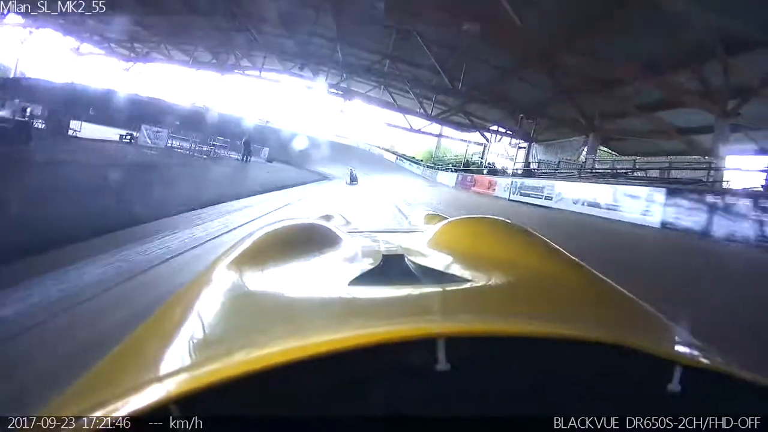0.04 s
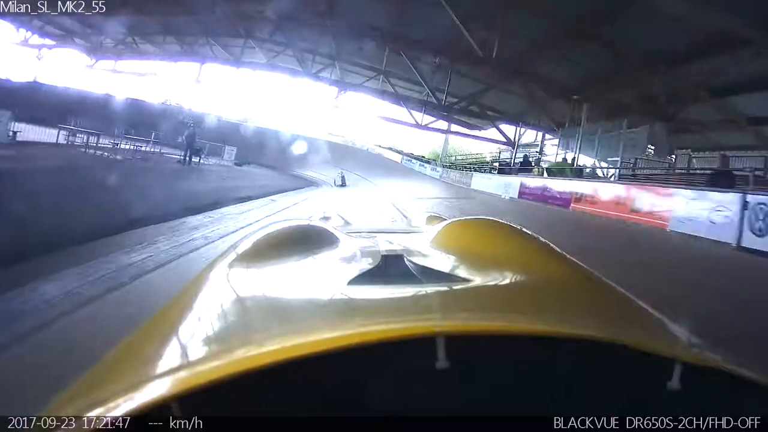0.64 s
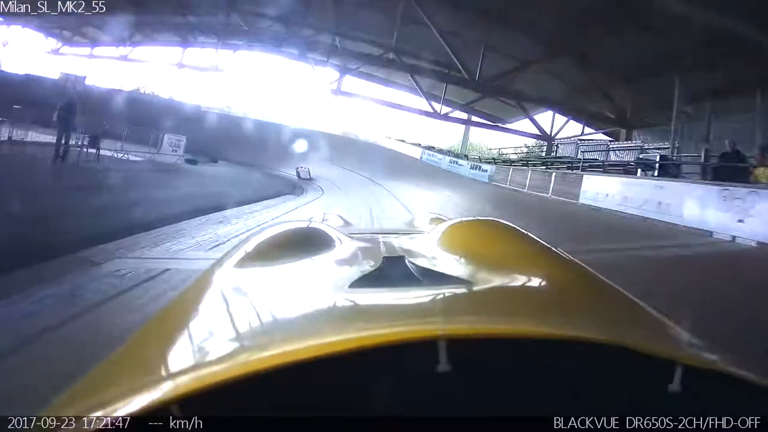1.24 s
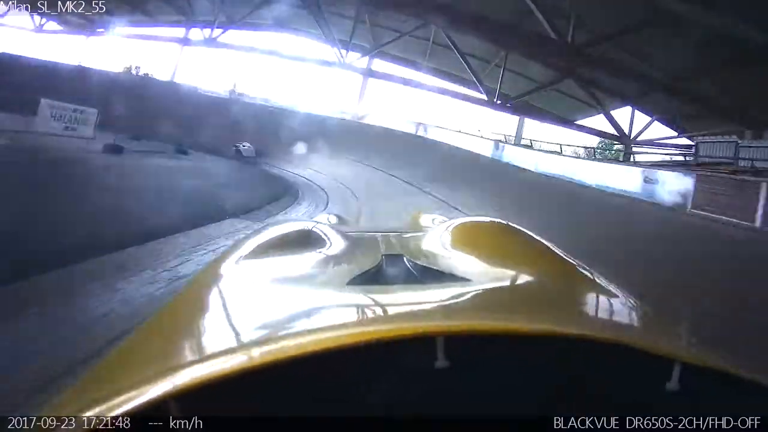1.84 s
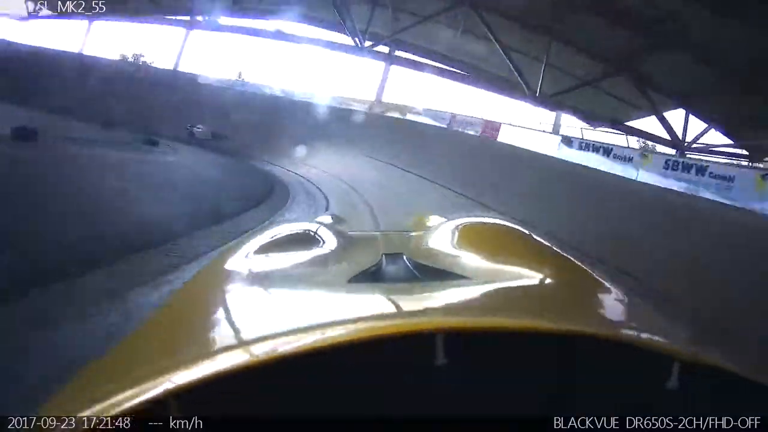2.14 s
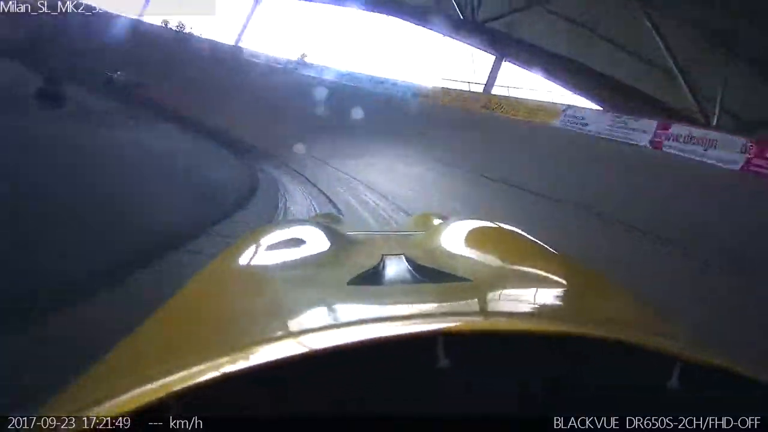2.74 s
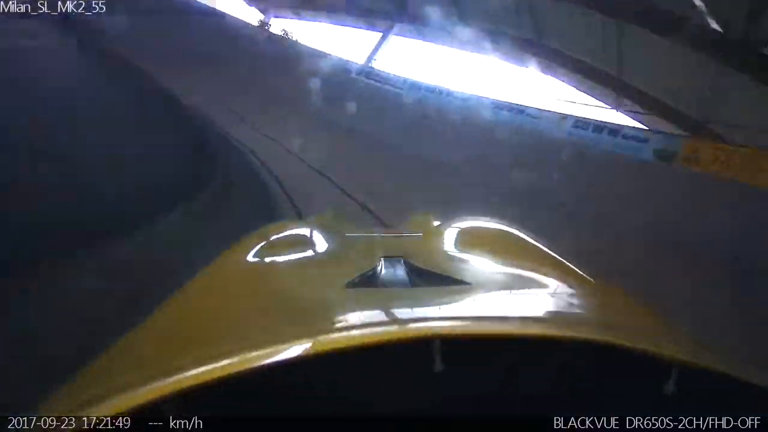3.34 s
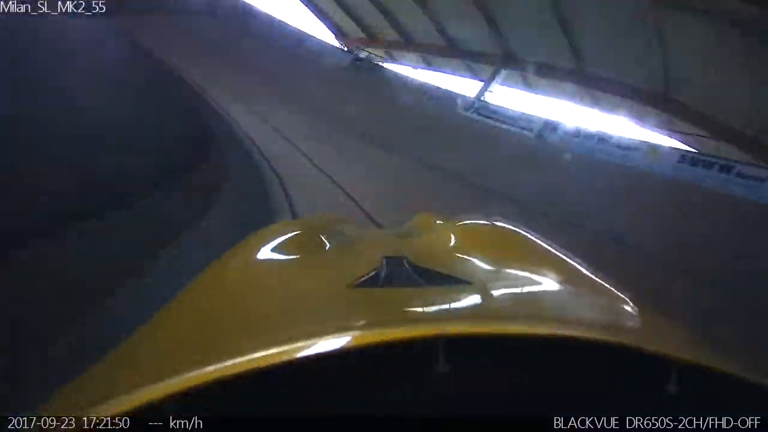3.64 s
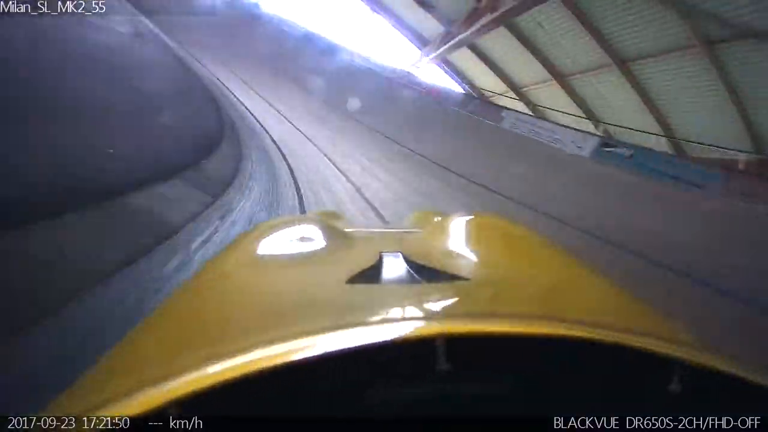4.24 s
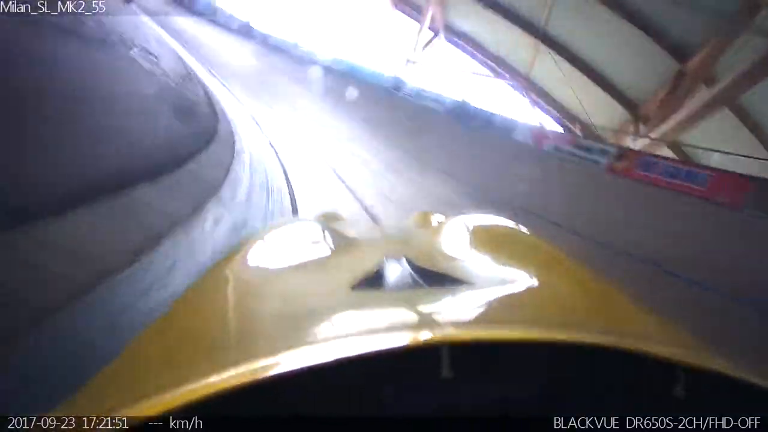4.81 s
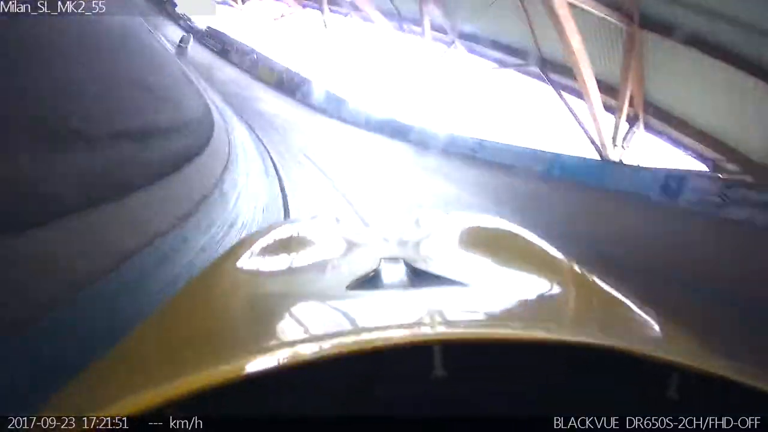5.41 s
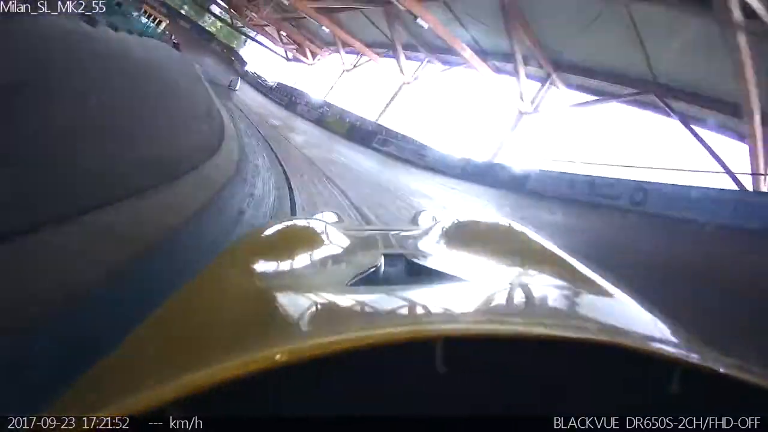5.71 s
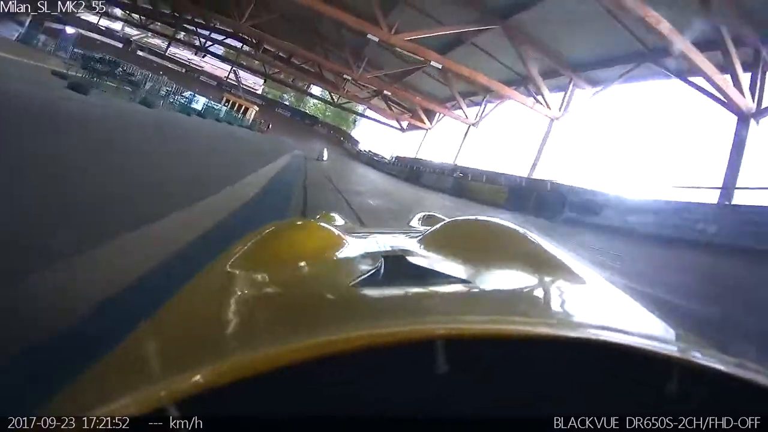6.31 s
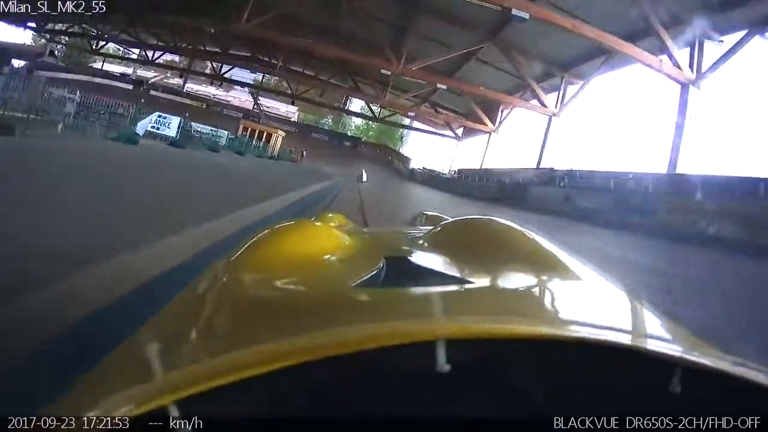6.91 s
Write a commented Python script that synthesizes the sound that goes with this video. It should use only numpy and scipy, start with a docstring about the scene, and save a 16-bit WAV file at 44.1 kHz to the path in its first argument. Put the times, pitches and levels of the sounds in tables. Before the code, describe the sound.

A deep, throbbing rumble with hollow thumps and rattles inside an enclosed pedal vehicle rolling fast around a covered track.

```python
"""A deep, throbbing rumble with hollow thumps: on board a velomobile, fast through a covered track's bend.
The track and the unround wheels shake the resonant shell, and the rumble swells as the banked turn
loads the tyres. Joints thump, loose fittings rattle, the drivetrain ticks, a tyre brushes its wheel well.
The chain hums with each push and rubs once per crank turn. The small microphone is driven to its limit."""
import sys
import numpy as np
from scipy import signal
from scipy.fft import rfft, irfft
from scipy.io import wavfile
from scipy.ndimage import uniform_filter1d, map_coordinates

SR = 44100
rng = np.random.default_rng(int(sys.argv[2]) if len(sys.argv) > 2 else 0)


def dump(signal):
    """Clip the signal to [-1, 1] and save it as 16-bit WAV at the path in sys.argv[1]."""
    limited = np.clip(np.atleast_2d(signal).T, -1, 1)
    pcm = np.round(limited * 32767).astype(np.int16)
    wavfile.write(sys.argv[1], SR, pcm)


N = 311346
SIZE = 2 ** 14  # samples in one hit or impulse response
TIME, AGE = np.arange(N) / SR, np.arange(SIZE) / SR
FREQ = np.maximum(np.arange(SIZE // 2 + 1) * SR / SIZE, 1)
TOP_HZ = 7330
CRANK_TURN_S, FIRST_PUSH_S = 0.788, 0.14

# speed of the wheels: time_s, turns_per_s
WHEEL_SPEED = [(0, 9.38), (1.2, 9.42), (2.1, 9.56), (3.3, 9.9), (4.6, 9.84), (6, 9.7), (7.06, 9.52)]
# tone of a contact on the shell: frequency_hz, gain_db
CONTACT_EQ = [(300, -26), (800, 6), (1050, 3), (1400, -1), (2000, -1.5), (2900, -4), (3900, -8),
              (5200, -8.5), (6300, -14.5), (7400, -20)]


def undb(db):
    """Decibels to gain."""
    return 10 ** (np.asarray(db) / 20)


def unit(x):
    """Scale to rms 1."""
    return x / np.sqrt(np.mean(np.abs(x) ** 2))


def add(out, start_s, sound):
    """Mix a sound in at a time."""
    part = out[max(int(start_s * SR), 0):][:len(sound)]
    part += sound[:len(part)]


def walk(rate_hz):
    """Random levels joined by straight lines; spread near 1."""
    levels = rng.standard_normal(2000)
    return 1.2 * np.interp(TIME * rate_hz, np.arange(len(levels)), levels)


def blow(rise_s, t60_s):
    """Envelope of a hit that builds up and dies away."""
    return (1 - np.exp(-AGE / rise_s)) * np.exp(-np.log(1000) * AGE / t60_s)


def swell(peak_s, rise_s, fall_s):
    """Bell-shaped envelope with its own attack and release."""
    width_s = np.where(TIME < peak_s, rise_s, fall_s)
    return np.exp(-np.minimum(((TIME - peak_s) / width_s) ** 2 / 2, 50))


def colour(points, tilt_db=0):
    """EQ curve through (Hz, dB) points, tilted by tilt_db an octave, with the top rolled off."""
    hz, db = np.transpose(points)
    gain = undb(np.interp(np.log(FREQ), np.log(hz), db + tilt_db * np.log2(hz)))
    gain = gain / np.sqrt(1 + (FREQ / TOP_HZ / 1.15) ** 16)
    cepstrum = irfft(np.log(gain))  # folded to minimum phase: nothing rings ahead of a hit
    cepstrum[1:SIZE // 2] *= 2
    cepstrum[SIZE // 2 + 1:] = 0
    return np.exp(rfft(cepstrum))


def resonance(hz, width_hz):
    """Response of one damped mode, gain 1 at its centre."""
    return 1 / (1 + 1j * (FREQ / hz - hz / FREQ) * hz / width_hz)


def panels(modes):
    """Response of a wall with modes given as (pitch_hz, width_hz, lift_db)."""
    return np.prod([1 + (undb(db) - 1) * resonance(hz, width) for hz, width, db in modes], axis=0)


def through(force, response):
    """Filter a force, keeping the level of a white one."""
    return signal.fftconvolve(force, irfft(unit(response)))[:len(force)]


def noise(response):
    """Steady noise coloured by a response; rms near 1."""
    return through(rng.standard_normal(N), response)


def grit(spread_db, size=N, grain=32):
    """Dense tiny contacts of unequal strength, each grain samples long; rms 1."""
    strength = np.repeat(undb(spread_db * rng.standard_normal(size // grain + 1)), grain)
    return unit(strength[:size] * rng.standard_normal(size))


def steadied(x, span_s, amount):
    """Hold back the largest swings of a vibration, as a damper does; rms 1."""
    power = uniform_filter1d(x ** 2, int(span_s * SR))
    return unit(x / (power + 1e-3) ** (amount / 2))


def strike(envelope, response, spread_db):
    """A flurry of contacts rings a body, with the energy of its envelope."""
    ring = through(envelope * grit(spread_db, size=SIZE), response)
    return unit(ring) * np.sqrt(np.mean(envelope ** 2))


def pedalling(dead_centre_share=0.13):
    """Drive of the legs: 1 in mid-push, twice a crank turn, and least at the dead centres."""
    leverage = np.abs(np.cos(2 * np.pi * (TIME - FIRST_PUSH_S) / CRANK_TURN_S))
    return dead_centre_share + (1 - dead_centre_share) * leverage


def sway(load, turns):
    """Sub-bass bed: the shell rocks on its suspension and throbs once per wheel turn."""
    # tone of the sway: frequency_hz, gain_db
    sway_eq = [(5, -16), (17, -4.5), (27, -1), (40, -1.5), (56, -3), (68, -4), (88, -10), (108, -12),
               (128, -16), (200, -34), (500, -72.5)]
    rocking = steadied(noise(colour(sway_eq)), span_s=0.16, amount=0.6)
    throb_db = 1.85 * np.sin(2 * np.pi * turns)
    return undb(-14 + 2.5 * load + throb_db) * rocking


def wheel_drone(turns, waver_db=3):
    """Unround wheels drone on the multiples of their turning rate, each wavering in strength."""
    # shakes at once, twice, three times ... a wheel turn: level_db
    harmonics = [-27.5, -20, -18.5, -27, -23.5, -27.5, -20, -26, -32.5]
    out = 0
    for order, db in enumerate(harmonics, start=1):
        waver = undb(waver_db * walk(4))
        out += undb(db) * unit(waver * np.sin(2 * np.pi * (order * turns + rng.random())))
    return out


def heaves(half_s=0.036):
    """Each long wave in the track bounces the shell on its suspension a few times."""
    # waves in the track: peak_s, level_db, pitch_hz
    waves = [(1.611, -6.5, 30), (2.56, -7.5, 28), (3.15, -8, 29.24), (3.68, -8, 34.8), (4.25, -10, 25.2),
             (4.9, -8, 29.98)]
    out = 0
    for peak_s, db, hz in waves:
        bounce = unit(np.sin(2 * np.pi * (hz * TIME + rng.random())))
        out += undb(db) * swell(peak_s, half_s, half_s) * bounce
    return out


def shudder():
    """A low judder of the shell comes on entering the bend and slowly settles."""
    judder = steadied(noise(resonance(hz=93.5, width_hz=76) ** 2), span_s=0.12, amount=0.39)
    return undb(-15.5) * swell(peak_s=3.17, rise_s=0.095, fall_s=0.3) * judder


def tread_hiss(shell, load, roughness_db):
    """Tiny contacts of the tread make a fine hiss, louder in the bend and on rough patches."""
    # tone of the tread: frequency_hz, gain_db
    hiss_eq = [(500, -13), (1200, 9.5), (1900, 0.5), (2700, -2), (3300, -6), (4000, -13), (5400, -9),
               (6300, -14.5), (7400, -18)]
    return undb(-43.5 + 2.5 * load + roughness_db) * through(grit(3.6), colour(hiss_eq) * shell)


def well_drum(load, hz=536, sag_hz=28):
    """The track keeps the wheel wells ringing on one hollow note, which sags under load."""
    ring = noise(resonance(hz, width_hz=38) ** 2)
    slowed_position = np.cumsum(1 - load * sag_hz / hz)
    return unit(map_coordinates(ring, [slowed_position], mode="mirror"))


def rumble(shell, load, drive, roughness_db):
    """The track drums through the tyres into the cabin, swelling with the bend and with each push."""
    # tone of the rolling noise: frequency_hz, gain_db
    rumble_eq = [(70, -21.5), (125, -0.5), (185, 0), (310, -2.5), (460, -5), (660, -11.5), (850, -15),
                 (1000, -16), (1170, -25.5), (1500, -26), (1900, -34.5), (3000, -39.5), (7000, -63)]
    roar = steadied(noise(colour(rumble_eq) * shell), span_s=0.049, amount=0.81)
    drum = undb(-16.5 + 3 * load) * well_drum(load)
    level_db = -20.5 + 3 * load + 2 * (drive - 1) + 0.6 * roughness_db
    return undb(level_db) * (roar + drum)


def chain_hum(drive, teeth=16, wander=0.0143):
    """Links roll onto the sprocket with a hum that follows the wheels; the cabin air booms along."""
    # hum at full drive, one value per push of a leg: level_db
    pushes = [-27.5, -22, -22.5, -20, -22, -17.5, -26.5, -18, -24, -20, -21, -18.5, -19.5, -19.5, -18.5,
              -28.5, -25, -25]
    push_s = FIRST_PUSH_S + np.arange(len(pushes)) * CRANK_TURN_S / 2
    mesh_hz = teeth * np.interp(TIME, *np.transpose(WHEEL_SPEED)) * (1 + wander * walk(12))
    mesh = unit(np.sin(2 * np.pi * np.cumsum(mesh_hz) / SR))
    boom = steadied(noise(resonance(hz=153.6, width_hz=10) ** 2), span_s=0.032, amount=1)
    return undb(np.interp(TIME, push_s, pushes)) * drive * (mesh + undb(-10.5) * boom)


def chain_rub(shell, sing_width_hz=590, whistle_width_hz=75, linger=1.5):
    """Links rasp along their guide once per crank turn, and the metal sings, never quite alike."""
    # rubs of the chain: peak_s, ring_db, rasp_db, rise_s, pitch_hz, whistle_lift_db
    rubs = [(0.3, -49.5, -33.5, 0.037, 5630, 3), (1.102, -51, -38.5, 0.033, 5560, 7),
            (1.925, -57, -40.5, 0.04, 5540, 3), (2.665, -57, -46, .04, 5570, 6),
            (3.463, -53.5, -43, 0.034, 5630, 6), (4.225, -50, -44, 0.036, 5520, 4),
            (5.014, -55.5, -40, 0.055, 5580, 2.5), (5.805, -49, -37, 0.031, 5610, 3),
            (6.62, -55, -36.5, 0.043, 5530, 3)]
    # tone of the rasp: frequency_hz, gain_db
    rasp_eq = [(700, -25), (1400, 8), (1850, -2.5), (2250, -4), (2900, -2), (3250, -17.5), (3600, -12),
               (4000, -14), (5600, -22), (7400, -23.5)]
    out, rasp = 0, noise(colour(rasp_eq) * shell)
    for peak_s, ring_db, rasp_db, rise_s, hz, whistle_db in rubs:
        whistle = panels([(hz, whistle_width_hz, whistle_db)])
        ring = noise(resonance(hz, sing_width_hz) ** 2 * whistle)
        out += swell(peak_s, rise_s, rise_s * linger) * (undb(ring_db) * ring + undb(rasp_db) * rasp)
    return out


def drivetrain_ticks(shell, faint_count=6, faint_db=-45.5):
    """Hard clicks of the drivetrain ring briefly in the cabin; faint ones fall at random."""
    # sharp ticks: start_s, level_db
    ticks = [(0.916, -42), (1.062, -39), (2.387, -40.5), (2.702, -43), (2.972, -34.5), (3.352, -47),
             (3.702, -29), (3.98, -32.5), (4.052, -44), (4.802, -41), (4.923, -35), (5.42, -33.5),
             (5.624, -42), (5.87, -36.5), (6.65, -36), (6.829, -36)]
    # tone of a tick: frequency_hz, gain_db
    tick_eq = [(600, -11.5), (1500, -5), (3000, 4.5), (4200, -4), (5000, 0.5), (6000, -15.5), (7400, -6.5)]
    out, body = np.zeros(N), colour(tick_eq) * shell
    decay = blow(0.00036, 0.0082) + 0.18 * blow(0.002, 0.11)
    crack = 10 * irfft(unit(body))  # the first contact is one clean impulse
    faint = [(when * N / SR, faint_db - 10 * softness) for when, softness in rng.random((faint_count, 2))]
    for start_s, db in ticks + faint:
        add(out, start_s, undb(db) * (crack + strike(decay, body, spread_db=0.5)))
    return out


def tyre_scrape(shell):
    """Deep in the turn, rubber sticks and slips on the wheel well, whose wall squeaks."""
    # brushes of the tyre: peak_s, level_db, rise_s, fall_s
    scrapes = [(4.279, -23, 0.059, 0.015), (5.02, -29.5, 0.019, 0.024)]
    # squeaks of the wheel well: pitch_hz, width_hz, lift_db
    squeaks = [(969, 13, 13.5), (1046, 24, 12.5), (2960, 75, 5.5), (3630, 90, 5), (5500, 200, 3)]
    force = sum(undb(db) * swell(peak_s, rise_s, fall_s) for peak_s, db, rise_s, fall_s in scrapes)
    return through(force * grit(1.3), colour(CONTACT_EQ, tilt_db=-3) * shell * panels(squeaks))


def rattles(shell, ring_width_hz=150, ring_lift_db=7.5):
    """A loose fitting cracks against the shell, then rings and chatters in a dying flurry."""
    # knocks of the fittings: start_s, level_db, t60_s, tilt_db_per_octave, pitch_hz
    knocks = [(0.539, -45, 0.15, 5, 6550), (0.814, -27, 0.22, -10, 1420), (2.019, -31.5, 0.074, -2.5, 5500),
              (2.129, -28, 0.053, -6, 2260), (2.715, -27.5, 0.21, -5, 2820), (3.152, -35.5, 0.56, -2, 5500),
              (3.194, -20, 0.1, -2.5, 5470), (3.378, -17, 0.03, -10, 2260),
              (3.669, -31.5, 0.15, -3.5, 4370), (3.941, -25, 0.097, -5.5, 2863),
              (4.524, -18.5, 0.076, -12.5, 2270), (4.626, -28.5, 0.23, -3.5, 2260),
              (5.252, -20.5, 0.099, -7, 2230), (5.563, -22.5, 0.13, -4, 2750), (5.64, -30, 0.06, -3, 4330),
              (5.719, -27.5, 0.1, -1.5, 2440), (5.785, -22, 0.07, -3, 5500), (6.108, -17, 0.071, -9, 2300),
              (6.216, -21.5, 0.051, -9.5, 2320), (6.262, -37, 0.11, -1.5, 3800),
              (6.317, -33.5, 0.16, -2.5, 5550)]
    out = np.zeros(N)
    crack = undb(3) * blow(rise_s=0.0017, t60_s=0.018)
    for start_s, db, t60_s, tilt_db, hz in knocks:
        body = colour(CONTACT_EQ, tilt_db) * shell * panels([(hz, ring_width_hz, ring_lift_db)])
        add(out, start_s, undb(db) * strike(crack + blow(0.0023, t60_s), body, spread_db=0.5))
    return out


def clonk(tilt_db, scatter_db=1.5, detune=0.014):
    """The panels ring freely after a jolt; each clonk is duller or brighter by its own tilt."""
    # notes of the panels: pitch_hz, level_db, t60_s
    modes = [(279.6, -7.5, 0.13), (344, -6, 0.096), (587, -15, 0.24), (714.5, -22.5, 0.22),
             (843, -13.5, 0.11)]
    out = 0
    for hz, db, t60_s in modes:
        louder, sharper, phase = rng.standard_normal(3)
        note = unit(np.sin(2 * np.pi * (hz * (1 + detune * sharper) * AGE + phase)))
        level_db = db + tilt_db * np.log2(hz / 380) + scatter_db * louder
        out += undb(level_db) * blow(0.004, t60_s) * note
    return out


def joint_thumps(shell):
    """Each track joint jolts the shell: a dull thud under the clonk of its panels."""
    # wheels crossing joints: start_s, level_db, tilt_db_per_octave (low is dull, high is bright)
    joints = [(.086, -9, 1), (0.234, -9, -5.5), (.514, -8.5, 0), (0.659, -8.5, 0), (.806, -23, 4),
              (0.943, -8.5, -0.5), (1.239, -22, 5), (1.371, -8.5, -1.5), (1.797, -15.5, 1.5),
              (2.077, -12, 0.5), (2.465, -11.5, -3), (2.794, -13.5, 2.5), (2.93, -15.5, 1),
              (3.188, -12.5, -0.5), (3.351, -10, -3), (3.457, -14, 1), (3.531, -11.5, -4.5),
              (3.657, -11.5, -2.5), (3.891, -13.5, 2.5), (4.017, -12, -2), (4.504, -17, 0.5),
              (4.739, -8, -4), (4.996, -14.5, 2.5), (5.259, -14, -0.5), (5.522, -12.5, 0),
              (5.996, -11.5, 0)]
    # tone of the thud: frequency_hz, gain_db
    thud_eq = [(100, -19), (240, 3.5), (345, 5), (460, -5.5), (620, -9), (860, -13), (950, -17),
               (1150, -22.5), (2000, -34), (6000, -48)]
    out, jolt = np.zeros(N), blow(rise_s=0.0021, t60_s=0.11)
    for start_s, db, tilt_db in joints:
        thud = undb(-3.5) * strike(jolt, colour(thud_eq, tilt_db) * shell, spread_db=-1.5)
        add(out, start_s, undb(db) * (thud + clonk(tilt_db)))
    return out


def scene():
    """Low shaking, rolling noise, drivetrain and knocks meet inside the hollow shell, in mono."""
    # resonances of the shell: pitch_hz, width_hz, lift_db
    shell_modes = [(139.6, 21, 7.5), (243.2, 20, 5.5), (277.3, 16, 7), (314, 20, 2), (420, 33, 2.5),
                   (534.5, 17, 4.5), (592, 17, 5), (719, 16, 5), (814, 32, 2.5), (997, 30, -1),
                   (1346, 60, 7), (1510, 41, 2.5), (2290, 53, 1.5), (2880, 62, 3), (3730, 200, 2.5),
                   (4380, 110, 4), (5460, 150, 1.5)]
    # the banked turn presses the wheels into the track: time_s, extra_load (0-1)
    bend = [(2.7, 0.17), (3.3, 0.87), (4.0, 0.82), (4.35, 0.4), (5.3, 0.48), (6.3, 0.12), (7, 0.06)]
    shell, drive = panels(shell_modes), pedalling()
    load = np.interp(TIME, *np.transpose(bend))
    turns = np.cumsum(np.interp(TIME, *np.transpose(WHEEL_SPEED))) / SR
    roughness_db = walk(40)  # rough and smooth patches of track pass under the wheels
    shaking = sway(load, turns) + wheel_drone(turns) + heaves() + shudder()
    rolling = tread_hiss(shell, load, roughness_db) + rumble(shell, load, drive, roughness_db)
    drivetrain = chain_hum(drive) + chain_rub(shell) + drivetrain_ticks(shell)
    contacts = tyre_scrape(shell) + rattles(shell) + joint_thumps(shell)
    return (shaking + rolling + drivetrain + contacts)[None]


def record(dry):
    """The microphone rounds off the largest swings and cuts the top; both ends fade over 4 ms."""
    rounded = dry / (1 + dry ** 12) ** (1 / 12)
    fades = np.minimum(np.minimum(TIME, TIME[::-1]) / 0.004, 1)
    lowpass = signal.ellip(12, 0.1, 90, TOP_HZ, fs=SR, output="sos")
    return signal.sosfilt(lowpass, rounded * fades)


dry = scene()
out = record(dry)
dump(out)
```